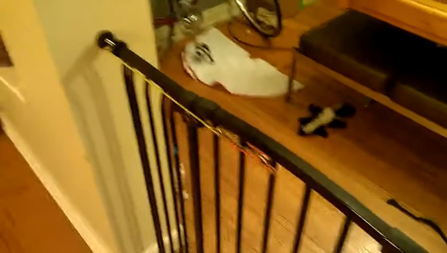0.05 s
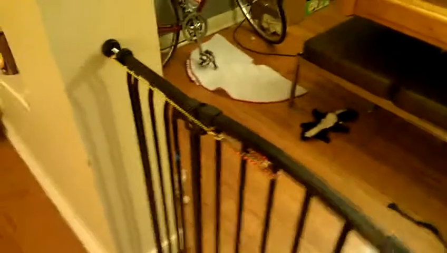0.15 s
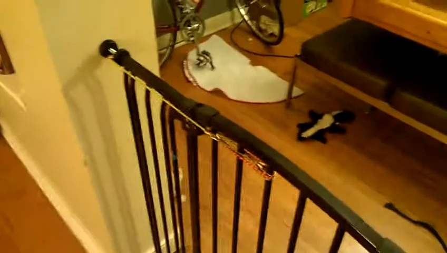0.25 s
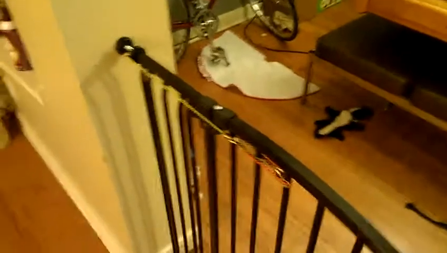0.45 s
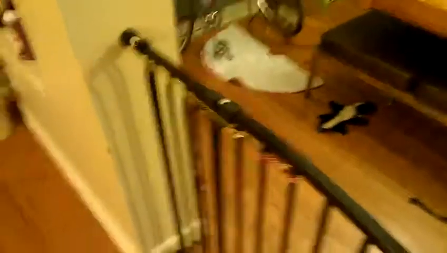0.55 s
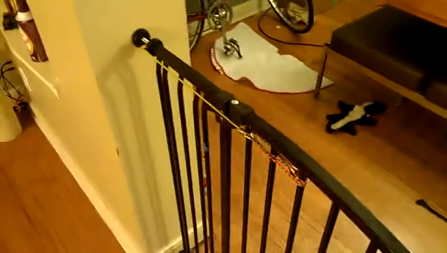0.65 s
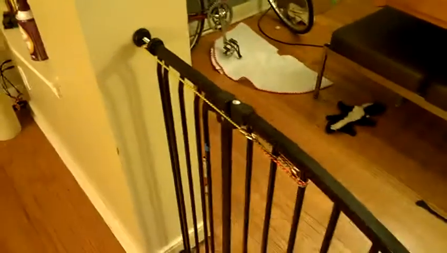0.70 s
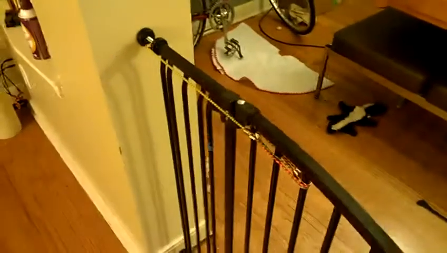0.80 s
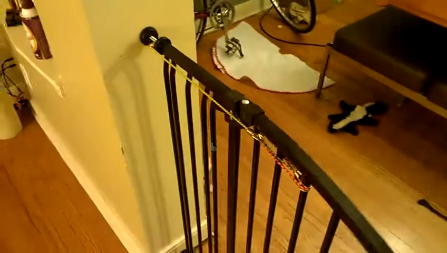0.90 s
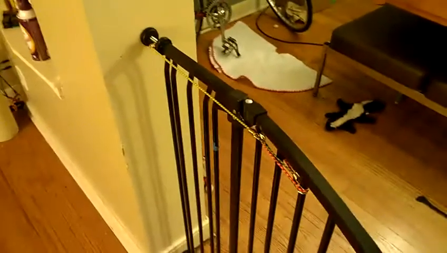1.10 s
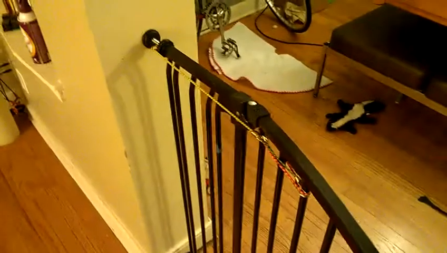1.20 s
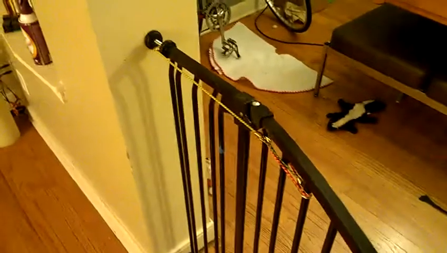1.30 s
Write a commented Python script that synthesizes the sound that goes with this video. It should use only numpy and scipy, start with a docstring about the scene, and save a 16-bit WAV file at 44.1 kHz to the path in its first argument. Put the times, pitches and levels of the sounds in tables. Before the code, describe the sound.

In a quiet room, a steel pet gate latches with light ticks and a sharp snap. A louder ringing clack and quick rattle follow as the frame shudders, then two faint wooden knocks.

```python
"""Light metallic ticks, as the latch of a steel pet gate rides up its catch and then snaps in.
The gate clacks against its frame, rebounds and rattles, and the frame shudders; soft knocks on wood
and a faint rub follow, in a quiet room with a wooden floor. Each impact excites the normal modes of
the struck body, which decay freely while the room reverberates. The loudest clacks overload the
microphones."""
import sys
import numpy as np
from scipy import signal
from scipy.fft import rfft, irfft, next_fast_len
from scipy.io import wavfile
from scipy.ndimage import uniform_filter1d, minimum_filter1d

SR = 44100
rng = np.random.default_rng(int(sys.argv[2]) if len(sys.argv) > 2 else 0)


def to_wav(s):
    """Save 16-bit WAV."""
    ch = np.atleast_2d(s).T  # columns
    pcm = np.round(np.clip(ch, -1, 1) * 32767)  # PCM
    wavfile.write(sys.argv[1], SR, pcm.astype(np.int16))


N = 59535


def amp(db):
    """Amplitude ratio of a level in decibels."""
    return 10 ** (np.asarray(db) / 20)


def unit(x):
    """Normalisation to rms 1."""
    return x / np.sqrt(np.mean(x ** 2) + 1e-20)


def along(points, hz):
    """Interpolation of (f/Hz, value) points on a logarithmic frequency axis."""
    f, value = np.transpose(points)
    return np.interp(np.log(hz + 1), np.log(f + 1), value)


def since(start):
    """Elapsed time in seconds, zero before the start."""
    return np.maximum(np.arange(N) / SR - start, 0)


def fade(t, t60):
    """Damping: exponential decay by 60 dB in t60 seconds."""
    return np.exp(-np.log(1000) * t / t60)


def rise(t, tau):
    """First-order build-up with time constant tau."""
    return 1 - np.exp(-t / tau)


def filtered(x, response):
    """Linear filtering: the spectrum is multiplied by a frequency response."""
    size = next_fast_len(N + SR // 4)
    return irfft(rfft(x, size) * response(np.fft.rfftfreq(size, 1 / SR)), size)[..., :N]


# Correlation between left and right: f/Hz, coefficient
CORRELATION = [(100, .9), (300, 1), (700, 0.94), (1400, 0.37), (3000, .32), (6000, 0.59), (12000, 0.056)]
def noise(spectrum):
    """Partial coherence: coloured stereo noise of rms 1, nearly alike on both sides in the bass."""
    def mid_side_gains(hz):
        angle = np.arccos(np.clip(along(CORRELATION, hz), -1, 1)) / 2
        return amp(along(spectrum, hz)) * [np.cos(angle), np.sin(angle)]
    mid, side = filtered(rng.standard_normal((2, N)), mid_side_gains)
    return unit(np.array([mid + side, mid - side]))


# Spectrum of the background: f/Hz, relative level/dB
AMBIENT_SPECTRUM = [(40, -41), (120, -35), (195, -9), (250, -9.5), (390, -3.5), (520, -8.5), (770, -2.5),
                    (1150, -8.5), (2060, -5), (3100, -10.5), (3850, -6), (4500, -8.5), (6700, -17),
                    (11000, -21.5), (15000, -41.5)]
# Envelope of the background: t/s, level/dB
AMBIENT_ENVELOPE = [(0, -55.5), (.8, -61.5), (.97, -66.5), (1.07, -65), (1.14, -64), (1.28, -65.5),
                    (1.35, -62.5)]
def room_tone():
    """Ambient noise: a faint broadband hiss whose level drifts slowly."""
    level_db = np.interp(since(0), *np.transpose(AMBIENT_ENVELOPE))
    return noise(AMBIENT_SPECTRUM) * amp(level_db)


# Spectrum of the rub: f/Hz, relative level/dB
RUB_SPECTRUM = [(1500, -36), (3400, -16), (3750, 0), (3950, 1), (4200, -20), (8000, -45)]
def rub(centre_s=1.18, half_width_s=.13, peak_db=-73.5):
    """Friction noise: a faint, narrow band swells and fades under a Gaussian envelope."""
    swell = np.exp(-((since(0) - centre_s) / half_width_s) ** 2)
    return amp(peak_db) * swell * noise(RUB_SPECTRUM)


# Reverberation time of the room: f/Hz, T60/s
REVERB_TIMES = [(100, .5), (250, 0.54), (800, .68), (2000, 0.52), (4000, 0.39), (7000, .38), (12000, 0.081)]
def reverberation(blows, spectrum, build_up_s=.0058):
    """Diffuse field: the energies of the blows add, build up and decay, the treble fastest."""
    hz, t, bands = signal.stft(noise(spectrum), SR, nperseg=256)
    t60 = along(REVERB_TIMES, hz)[:, None]
    power = 0
    for start, db, *_ in blows:
        age = np.maximum(t - start, 0)
        power = power + (amp(db) * rise(age, build_up_s) * fade(age, t60)) ** 2
    return signal.istft(bands * np.sqrt(power), SR)[1][:, :N]


RING_S, CRACK_T60_S = .4, .008
def ring(start, modes, scatter_db=2, phase_spread_rad=.77):
    """Free vibration: damped modes, initially near rms 1, reach each microphone in a different phase."""
    hz, db, t60 = np.transpose(modes)
    t = np.arange(int(RING_S * SR), dtype=np.float32) / SR
    phase = rng.uniform(0, 2 * np.pi, len(hz)) + phase_spread_rad * rng.standard_normal((2, len(hz)))
    waves = np.sin((2 * np.pi * hz[:, None] * t + phase[..., None]).astype(np.float32))
    nominal_rms = np.sqrt(np.sum(amp(db) ** 2) / 2)
    gains = amp(db + scatter_db * rng.standard_normal(len(hz))) / nominal_rms
    ringing = np.einsum("cmt,mt->ct", waves, gains[:, None] * fade(t, t60[:, None]))
    return np.pad(ringing, ((0, 0), (max(round(start * SR), 0), N)))[:, :N]


def struck(blows, spectrum, modes, attack_s, ring_t60, modes_db, room_db):
    """Impact excitation: each blow gives a crack, a dense noise-like ring, distinct modes and reverb."""
    dense_power, distinct = np.zeros((2, N)), np.zeros((2, N))
    for start, db, pan_db, crack_db in blows:  # pan: left minus right; crack: relative to the dense ring
        t = since(start)
        onset = amp([[db + pan_db / 2], [db - pan_db / 2]]) * rise(t, attack_s)
        crack = amp(crack_db) * fade(np.minimum(t, RING_S), CRACK_T60_S)
        dense_power += (onset * (crack + fade(t, ring_t60))) ** 2
        distinct += onset * ring(start, modes)
    direct = noise(spectrum) * np.sqrt(dense_power) + amp(modes_db) * distinct
    return direct + amp(room_db) * reverberation(blows, spectrum)


# Blows on wood: t/s, level/dB, pan/dB, crack/dB
WOOD_BLOWS = [(0.591, -52.5, 0, -6), (0.7027, -47.5, -2, 1)]
# Dense spectrum of the wood: f/Hz, relative level/dB
WOOD_SPECTRUM = [(60, -41), (120, -24), (290, -1), (480, -7), (850, -2), (1300, -10), (4000, -25),
                 (10000, -35)]
# Modes of the wood: f/Hz, relative level/dB, T60/s
WOOD_PARTIALS = [(296, -7.5, 0.39), (417, -7, 0.22), (600, -11, .12), (720, -5, .12), (855, 0, 0.19),
                 (1030, -4.5, 0.11)]
def wood_knocks():
    """Damped resonance: two soft blows excite the midrange modes of wood."""
    return struck(WOOD_BLOWS, WOOD_SPECTRUM, WOOD_PARTIALS,
                  attack_s=.0007, ring_t60=.11, modes_db=-2, room_db=-10.5)


# Blows of the frame on the walls: t/s, level/dB, pan/dB, crack/dB
FRAME_BLOWS = [(0.34, -42, -2, -1), (.384, -32, 0, 4), (.421, -35, -3.5, 4), (0.438, -41, -5, 2)]
# Dense spectrum of the frame: f/Hz, relative level/dB
FRAME_SPECTRUM = [(40, -32), (100, -21.5), (165, -8), (225, 1.5), (275, -3.5), (335, 2), (430, -8.5),
                  (700, -11), (1100, -10.5), (1800, -35), (4000, -67)]
# Modes of the frame: f/Hz, relative level/dB, T60/s
FRAME_PARTIALS = [(172, -6.5, 0.23), (231, 3, .45), (262, -5.5, .3), (333.4, -3.5, .3)]
def frame_shudder():
    """Structural vibration: the frame shudders against the walls in its low modes."""
    return struck(FRAME_BLOWS, FRAME_SPECTRUM, FRAME_PARTIALS,
                  attack_s=.004, ring_t60=.15, modes_db=-11, room_db=-6)


# Contacts of the latch with its catch: t/s, level/dB, pan/dB, crack/dB
TICK_BLOWS = [(.002, -43.5, 2, 6.5), (.0095, -40.5, 4, 6), (.063, -47, 2, 15), (0.1457, -36.5, 2, 7.5),
              (0.1704, -27.5, 2, 4), (.1822, -34.5, 1, 14.5), (0.1858, -35, -1.5, 12), (0.21, -36, 2, 1)]
SNAP_BLOW = [(.2234, -10.5, 2, 4.5)]
# Dense spectra of those contacts: f/Hz, relative level/dB
TICK_SPECTRUM = [(88, -67), (150, -39.5), (486, -27), (1250, -24), (1540, -13.5), (2500, -6), (2700, -9),
                 (5300, -3.5), (7640, -21.5), (9820, -24.5), (12600, -42), (15000, -69.5)]
SNAP_SPECTRUM = [(88, -93.5), (150, -64), (284, -36.5), (666, -45), (793, -30.5), (2170, -18.5),
                 (2390, -12.5), (3260, -10.5), (3730, -5), (4620, -3), (6940, -17), (8260, -15),
                 (15400, -47)]
# Modes of the latch: f/Hz, relative level/dB, T60/s
LATCH_PARTIALS = [(3363, -4.5, .25), (4244, 2, 0.3), (4255, -5.5, 0.1), (4700, -2.5, 0.17), (4552, -1, 0.2),
                  (4700, -6, .26), (4820, -5, .22), (5047, -13, 0.3), (5243, -7, 0.073), (5470, -7, .22),
                  (6480, -4.5, .18), (7940, -12.5, 0.36), (7850, -15, .2)]
def latch():
    """Natural frequencies: the same high modes ring as the latch ticks over its catch and springs home."""
    ticks = struck(TICK_BLOWS, TICK_SPECTRUM, LATCH_PARTIALS,
                   attack_s=.0003, ring_t60=.12, modes_db=-6, room_db=-6)
    snap = struck(SNAP_BLOW, SNAP_SPECTRUM, LATCH_PARTIALS,
                  attack_s=.00016, ring_t60=.19, modes_db=-3, room_db=-11.5)
    return ticks + snap


# Blows of the gate on its frame: t/s, level/dB, pan/dB, crack/dB
GATE_BLOWS = [(0.3371, -3, 2, 1.5), (.4093, -14.5, 6.5, 5.5), (0.4186, -15.5, 2, 4), (0.4331, -16.5, 3, -4)]
# Dense spectrum of the gate: f/Hz, relative level/dB
GATE_SPECTRUM = [(59, -64), (100, -43), (587, -24), (822, -14), (1060, -24.5), (1750, -11.5), (1910, -4.5),
                 (2160, -7.5), (2670, -5), (3030, -6), (3820, -0.5), (4070, -3.5), (4720, -3),
                 (7500, -16.5), (8880, -17), (12700, -27), (15400, -47.5)]
# Modes of the steel bars: f/Hz, relative level/dB, T60/s
BAR_PARTIALS = [(719, -7, 0.086), (1446, -6.5, 0.13), (1860, -2.5, .12), (1929, -7, .18), (2467, -8, .33),
                (2594, -1, 0.19), (3560, -4, .28), (3850, -4, .28), (3820, 0.5, 0.3), (4365, -5, 0.24),
                (4758, -1, 0.12), (4875, 1, 0.15), (8823, -11, 0.28), (9560, -7.5, 0.14)]
# Two lightly damped notes that outlast the clacks: f/Hz, level/dB, T60/s
LINGERING_PARTIALS = [(207, -61, 2.3), (3572, -61, 2.1)]
def gate(rebound_cutoff_hz=6430):
    """Inelastic collision: the gate hits its frame and rings; the softer rebounds carry less treble."""
    steel = dict(attack_s=.00043, ring_t60=.13, modes_db=-6, room_db=-13.5)
    clack = struck(GATE_BLOWS[:1], GATE_SPECTRUM, BAR_PARTIALS, **steel)
    rebounds = struck(GATE_BLOWS[1:], GATE_SPECTRUM, BAR_PARTIALS, **steel)
    low_pass = lambda hz: 1 / np.sqrt(1 + (hz / rebound_cutoff_hz) ** 10)
    t = since(GATE_BLOWS[0][0])
    notes = sum(amp(db) * fade(t, t60) * np.sin(2 * np.pi * hz * t) for hz, db, t60 in LINGERING_PARTIALS)
    return clack + filtered(rebounds, low_pass) + notes


def scene():
    """Superposition: the pressures of all sources add at the two microphones."""
    return latch() + gate() + frame_shudder() + wood_knocks() + rub() + room_tone()


def record(dry, threshold=1.2, window_s=.0003, low_cut_hz=110, top_hz=15500):
    """Peak limiting and finite bandwidth: the loudest peaks are held down, then bass and top are cut."""
    size = int(window_s * SR)
    needed_gain = threshold / np.maximum(np.abs(dry), threshold)
    limited = dry * uniform_filter1d(minimum_filter1d(needed_gain, size), size)
    high_pass = lambda hz: (1j * hz / (low_cut_hz + 1j * hz)) ** 2
    band_limit = lambda hz: np.clip((top_hz - hz) / 600 + .5, 0, 1)  # the edge is 600 Hz wide
    return filtered(limited, lambda hz: high_pass(hz) * band_limit(hz))


dry = scene()
out = record(dry)
to_wav(out)
```